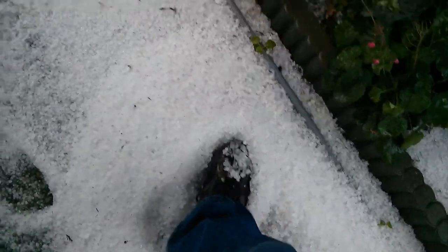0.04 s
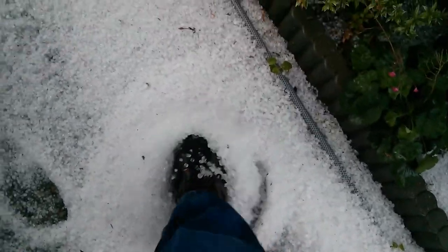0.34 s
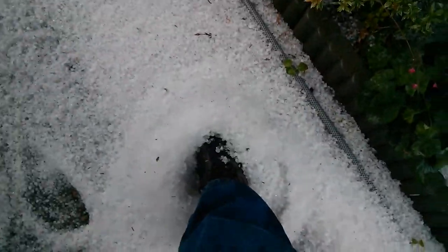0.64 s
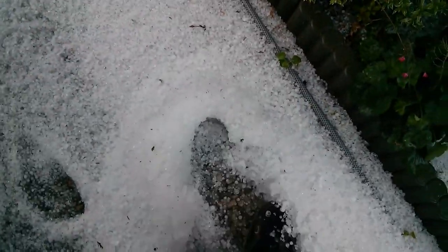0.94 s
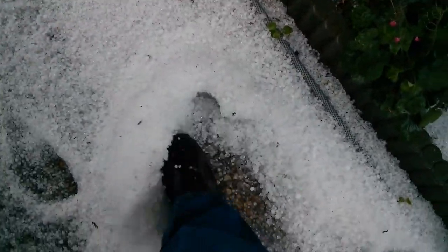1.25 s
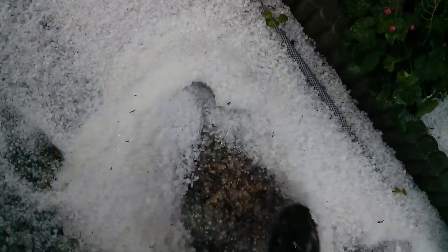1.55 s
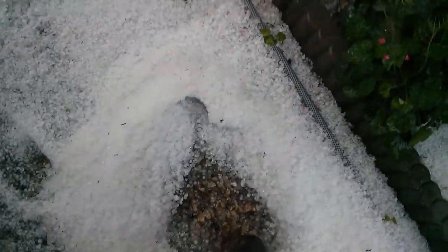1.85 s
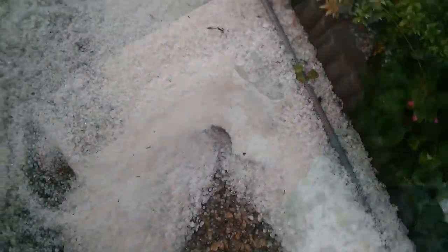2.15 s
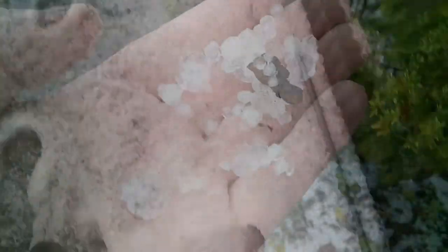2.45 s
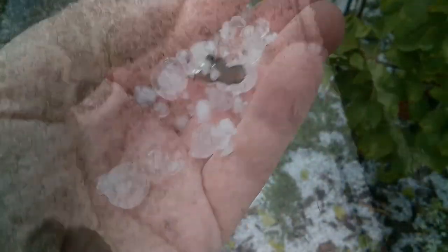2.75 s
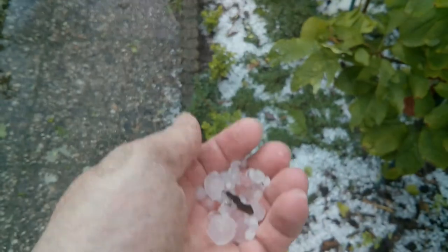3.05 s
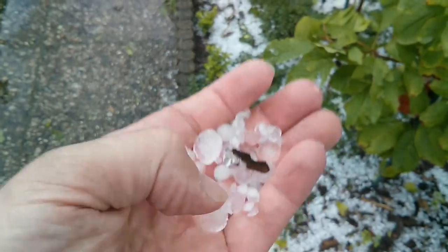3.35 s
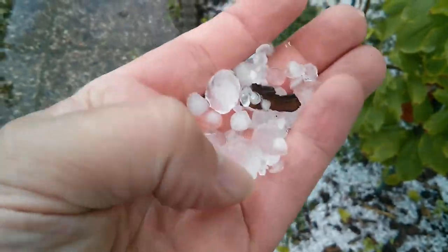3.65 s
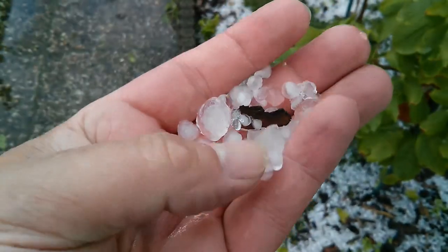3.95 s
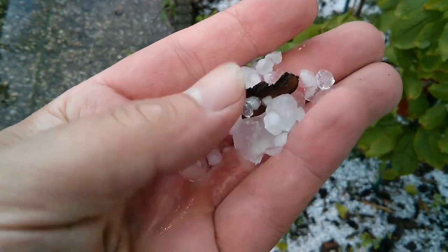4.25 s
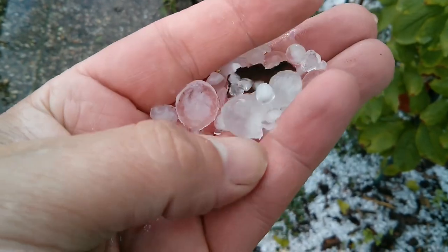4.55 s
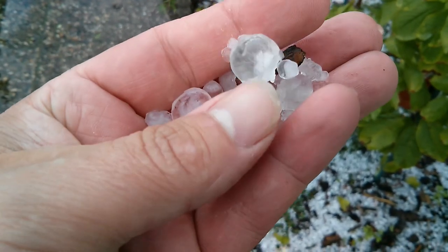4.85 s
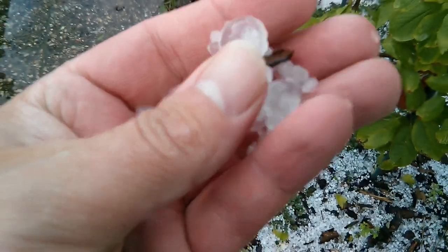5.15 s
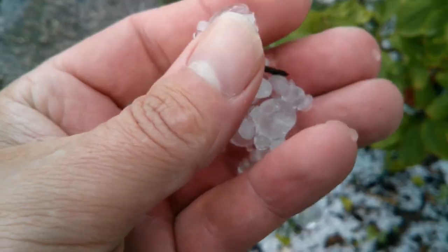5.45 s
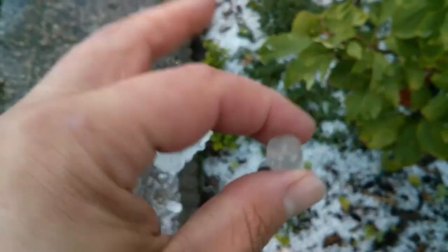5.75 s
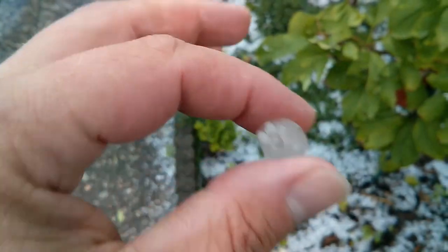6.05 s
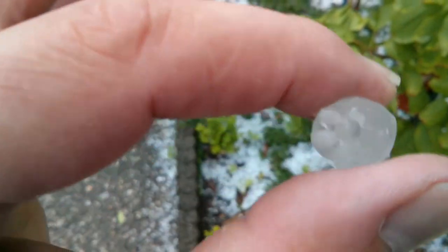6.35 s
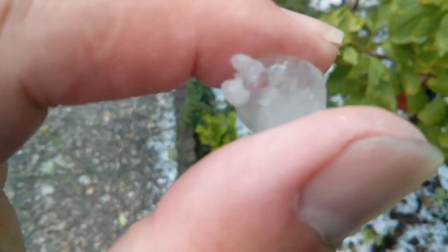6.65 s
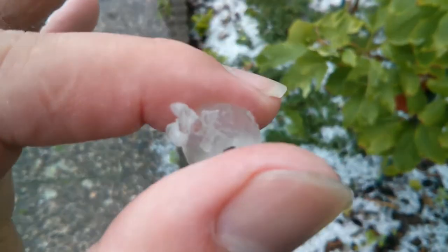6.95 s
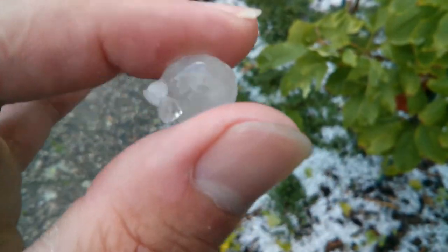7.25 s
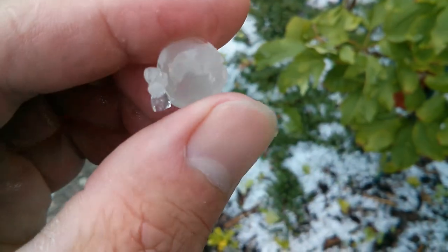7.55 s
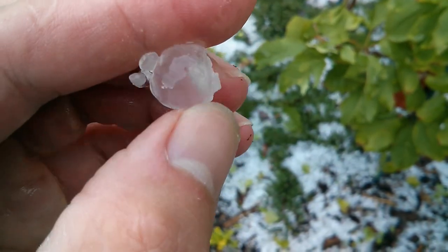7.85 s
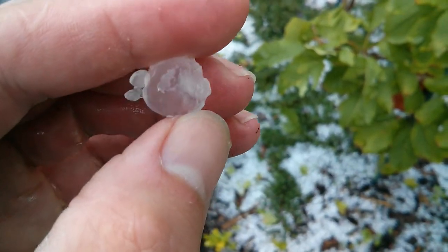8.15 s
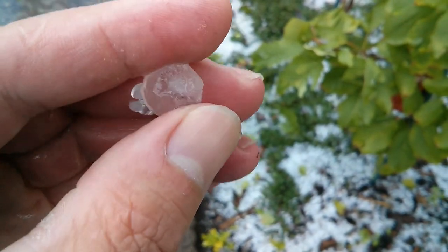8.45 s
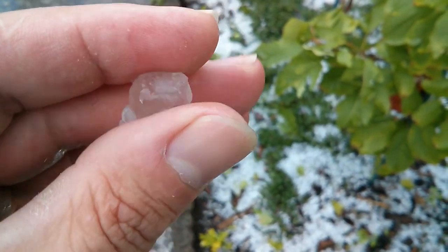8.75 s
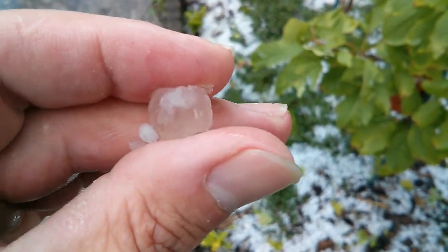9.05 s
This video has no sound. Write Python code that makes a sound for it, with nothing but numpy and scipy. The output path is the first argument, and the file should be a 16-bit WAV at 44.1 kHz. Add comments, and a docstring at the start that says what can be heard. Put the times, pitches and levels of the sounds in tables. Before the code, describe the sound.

Close to the microphone, a foot pushes through hail on the ground with a few loud, gritty crunches. Much quieter rustling and clicking follows as a handful of wet hailstones is handled. Falling stones then land with sharp, glassy clinks and a short rattle, and scattered drips and light ticks finish. Behind it all is a calm garden with a low rumble, light air and faint hiss.

```python
"""A low rumble, moving air and a fine hiss fill a quiet garden from start to end.
First a shoe scrapes several times through a thick layer of hailstones, which slip, snap and spray.
Then wet stones are rubbed together in a palm. Near 6 s two slip away and clink on something hard.
Last, melt water drips and one stone is turned between the fingers, with soft knocks and ticks.
The sound is mono and cuts out for a few instants during the scraping and the rubbing."""
import sys
import numpy as np
from scipy import signal
from scipy.fft import rfft, irfft, next_fast_len
from scipy.io import wavfile
from scipy.ndimage import uniform_filter1d, map_coordinates

SR = 44100
rng = np.random.default_rng(int(sys.argv[2]) if len(sys.argv) > 2 else 0)


def store_pcm(level_fs):
    """Save levels as 16-bit WAV."""
    pcm = np.round(np.clip(level_fs, -1, 1) * 32767).astype(np.int16)
    wavfile.write(sys.argv[1], SR, np.atleast_2d(pcm).T)


N = 400869
TIME = np.arange(N) / SR

# The bright tone of ice touching ice. Each row: frequency in Hz, level in dB.
ICE_TONE = [(500, -32), (3200, -23.5), (4400, -8.5), (5500, -0.5), (7000, 0.5), (9000, 3.5), (10500, 0),
            (13000, -3), (16000, -1.5)]
# The tone of the fine hiss and of splashes. Each row: frequency in Hz, level in dB.
HISS_TONE = [(2000, -33.5), (3500, -20.5), (5000, -7), (7000, 0), (8700, 2.5), (10500, -4), (13000, -9),
             (16000, -12)]
# The hiss is strongest while the palm is full of melting ice. Each row: time in seconds, level in dB.
HISS_LEVELS = [(1.42, -63), (1.75, -46), (2.6, -50), (4.3, -52), (5.6, -52.5), (6.35, -47), (7.0, -67),
               (7.7, -62), (8.7, -72.5), (9.05, -57)]


def amp(db):
    """Turn decibels into a number to multiply a sound by."""
    return 10 ** (np.asarray(db) / 20)


def unit(x):
    """Scale a sound so that its average power is 1."""
    return x / np.sqrt(np.mean(x ** 2) + 1e-20)


def fade(t, t60):
    """A fade that drops by 60 dB every t60 seconds."""
    return amp(-60 * t / t60)


def curves(rows):
    """Join rows that begin with a time by straight lines: one curve for each further column."""
    times, *columns = np.transpose(rows)
    return [np.interp(TIME, times, column) for column in columns]


def wobble(rate):
    """A smooth curve through random values, rate of them a second."""
    return map_coordinates(rng.standard_normal(int(N * rate / SR) + 4), [TIME * rate])


def colour(x, tone, size=4096):
    """Filter a sound with a tone table, whose rows give frequency in Hz and level in dB."""
    hz, db = np.transpose(tone)
    gain = amp(np.interp(np.log(np.fft.rfftfreq(size, 1 / SR) + 1), np.log(hz), db))
    # these steps keep the filter from ringing before a hit arrives
    cepstrum = irfft(np.log(gain))
    cepstrum[1:size // 2] *= 2
    cepstrum[size // 2 + 1:] = 0
    return signal.fftconvolve(x, irfft(np.exp(rfft(cepstrum))))[:len(x)]


def noise(tone, count=N):
    """Steady noise with the given tone."""
    return unit(colour(rng.standard_normal(count), tone))


def add(track, start, sound):
    """Mix a sound into the track, start seconds in."""
    first = max(round(start * SR), 0)
    part = track[first:first + len(sound)]
    part += sound[:len(part)]


def snaps(rate, spread_db, count=N):
    """Random clicks, about rate a second, some stronger than others."""
    hit = rng.random(count) < rate / SR
    strength = amp(spread_db * np.clip(rng.standard_normal(count), -2, 2))
    return unit(hit * strength * rng.choice([-1, 1], count))


def resonate(x, hz, q):
    """Make a sound ring at one pitch; a higher q rings longer."""
    hz = min(hz, SR / 3)
    return signal.lfilter(*signal.iirpeak(hz, max(q, 4 * hz / SR), SR), x)


def garden():
    """Distant rumble and moving air swell with the same gusts, under a fine hiss."""
    # The background. Each row: time in seconds, rumble level in dB, air level in dB, before the lifts.
    levels = [(1.42, -69, -60.5), (1.57, -54, -54), (1.78, -52, -51.5), (2.61, -53.5, -51.5),
              (2.91, -59, -58), (3.23, -56.5, -58.5), (3.96, -61.5, -60.5), (4.47, -61.5, -60.5),
              (5.05, -59, -57), (7.04, -54.5, -59.5), (7.66, -59, -58), (8.02, -57.5, -58.5),
              (8.23, -52, -58.5), (9.09, -48.5, -56)]
    # The tones of the rumble and the air. Each row: frequency in Hz, level in dB.
    rumble_tone = [(13, -39.5), (24, -15), (42, -1.5), (65, 2), (90, -4), (130, -4), (165, -9), (200, -2),
                   (225, -6), (330, -19), (430, -36.5), (730, -90)]
    air_tone = [(150, -27), (300, 1.5), (480, -3.5), (680, -3), (800, -11.5), (910, -4), (1080, -10),
                (1400, -6), (1620, -13), (2100, -9), (2600, -19.5), (3300, -25), (5000, -24.5)]
    rumble_lift_db, air_lift_db = 3, 1.5
    rumble_db, air_db = curves(levels)
    hiss_db, = curves(HISS_LEVELS)
    gust = wobble(6.5)
    rumble = noise(rumble_tone) * amp(rumble_db + rumble_lift_db + 2.7 * gust)
    air = noise(air_tone) * amp(air_db + air_lift_db + 0.43 * gust + 0.5 * wobble(8.1))
    hiss = noise(HISS_TONE) * amp(hiss_db + 0.52 * wobble(7.6))
    return rumble + air + hiss


def echo(x, t60):
    """Walls and paving send the sound back as a soft blur."""
    t = np.arange(SR // 2) / SR
    tail = rng.standard_normal(len(t)) * fade(t, t60) * (1 - np.exp(-t / 0.0031))
    return signal.fftconvolve(x, tail / np.linalg.norm(tail))[:N]


def crackle():
    """Melting ice on the skin crackles faintly, in clusters, just under the level of the hiss."""
    hiss_db, = curves(HISS_LEVELS)
    grains = sum(resonate(snaps(rate=35, spread_db=6), hz, q=5) for hz in (6200, 7800, 9800))
    clusters = amp(2.5 * wobble(5.3))
    return unit(colour(grains, ICE_TONE) * clusters) * amp(hiss_db - 0.5)


def squeaks():
    """Wet ice gives short, faint whistles."""
    # Each row: start in seconds, length in seconds, pitch in Hz, level in dB.
    whistles = [(0.006, 0.15, 4470, -58), (0.048, 0.078, 5630, -53), (1.619, 0.064, 4930, -56),
                (7.481, 0.02, 5070, -55)]
    out = np.zeros(N)
    for start, length, hz, db in whistles:
        swell = np.hanning(int(length * SR))
        tone = resonate(resonate(rng.standard_normal(len(swell)), hz, q=7.7), hz, q=7.7)
        add(out, start, amp(db) * unit(tone * swell))
    return out


def drips():
    """A drop of melt water taps on wet ground and its droplets patter down after it."""
    # Each row: start in seconds, peak of the tap in dB, level of the splash in dB.
    drops = [(6.5147, -15.5, -36), (6.6798, -19, -44.5), (6.9117, -33, -44), (7.217, -32, -57),
             (7.4168, -35.5, -47), (7.6136, -31, -47.5), (7.8889, -35, -48.5), (8.32, -32.5, -46.5),
             (8.9046, -19.5, -40.5)]
    out, t = np.zeros(N), np.arange(SR // 4) / SR
    for start, tap_db, splash_db in drops:
        blow = (t == 0) + 0.26 * fade(t, 0.011) * rng.standard_normal(len(t))
        tap = colour(resonate(blow, 8300, q=1.6), ICE_TONE)
        droplets = snaps(rate=2000, spread_db=2, count=len(t)) + 0.7 * rng.standard_normal(len(t))
        splash = unit(colour(droplets, HISS_TONE)) * fade(t, 0.2) * (1 - np.exp(-t / 0.0026))
        add(out, start, amp(tap_db) * tap / np.abs(tap).max() + amp(splash_db) * splash)
    return out


def knocks():
    """The hand makes dull bumps, each with a small icy edge."""
    # Each row: start in seconds, level in dB, pitch in Hz, icy edge in dB compared with the thud.
    bumps = [(3.153, -31.5, 388, -19), (3.336, -34.5, 380, -11.5), (3.696, -29.5, 262, -28),
             (4.8907, -18.5, 652, -12), (4.973, -35, 326, -18), (6.2, -37, 530, -12),
             (7.056, -28.5, 410, -24), (7.61, -35.5, 2110, -28), (8.401, -33.5, 1435, -24)]
    out, t = np.zeros(N), np.arange(SR // 8) / SR
    rise = 1 - np.exp(-t / 0.00102)
    for start, db, hz, edge_db in bumps:
        thud = np.sin(2 * np.pi * hz * t) * fade(t, 0.022)
        dull = resonate(rng.standard_normal(len(t)), hz * 0.46, q=0.58)
        flesh = unit(resonate(dull, hz * 0.46, q=0.58)) * fade(t, 0.11)
        bright = resonate(rng.standard_normal(len(t)), 5430, q=3.3)
        edge = unit(resonate(bright, 5200, q=2.7)) * fade(t, 0.056)
        add(out, start, amp(db) * rise * (thud + 0.19 * flesh + amp(edge_db) * edge))
    return out


def ticks():
    """A stone bounces or taps another and rings for an instant; its neighbours rattle briefly."""
    # Each row: start in seconds, peak level in dB, pitch in Hz.
    taps = [(1.7604, -20, 9680), (1.817, -15.5, 7680), (1.8911, -22, 7990), (3.1443, -14, 6550),
            (3.4416, -18.5, 8690), (4.3313, -14, 9040), (4.5253, -19.5, 7390), (4.8269, -21, 9580),
            (5.9664, -16.5, 7220), (5.9899, -18, 7640), (6.1703, -9.5, 5230), (6.1808, -7.5, 8560),
            (6.1852, -4, 8180), (6.202, 0.5, 9040), (6.2296, -11.5, 8390), (6.3415, -14, 7370),
            (6.3794, -20.5, 9470), (6.3844, -15.5, 8540), (6.4176, -23.5, 7720), (6.4467, -25, 8820),
            (6.7963, -34, 7260), (6.8475, -35, 5280), (8.8352, -36, 4750), (8.893, -29, 8700)]
    out, t = np.zeros(N), np.arange(SR // 8) / SR
    for start, db, hz in taps:
        blow = (t == 0) + 0.17 * fade(t, 0.02) * rng.standard_normal(len(t))
        tick = colour(resonate(blow, hz, q=2.8), ICE_TONE)
        add(out, start, amp(db) * tick / np.abs(tick).max())
    return out


def clinks():
    """A falling stone strikes something hard: a few clear notes ring over a clatter of crowded ones."""
    # Each row: start in seconds, level in dB, seconds to fade by 60 dB, low cut in Hz.
    landings = [(5.8855, -5.5, 0.13, 439), (6.0769, -9.5, 0.18, 3870), (6.262, -18.5, 0.14, 3450)]
    # The clear notes, then the tone of the clatter. Each row: frequency in Hz, level in dB.
    notes = [(2290, -19), (3800, -19), (4720, -17), (4940, -19.5), (5630, -4.5), (5930, -9), (6360, -18),
             (6555, -0.5), (7350, -0.5), (7642, -8), (7931, 0), (8460, 3.5), (8640, -11.5), (9125, -5),
             (11640, -24)]
    clatter_tone = [(300, -40.5), (2800, -35), (3700, -15.5), (4700, -16.5), (5600, -6), (6500, 1.5),
                    (7000, -11.5), (7600, 0), (9200, 1), (9900, -11.5), (12000, -17.5), (16000, -21)]
    out, t = np.zeros(N), np.arange(SR // 3) / SR
    for start, db, t60, low_hz in landings:
        changes_db = rng.normal(0, 1.5, len(notes))
        ring = sum(amp(level + change) * np.sin(2 * np.pi * (hz * t + rng.random()))
                   for (hz, level), change in zip(notes, changes_db))
        clatter = noise(clatter_tone, len(t)) * fade(t, 0.92 * t60)
        crack = noise(ICE_TONE, len(t)) * fade(t, 0.018)
        hit = 0.59 * unit(ring) * fade(t, t60) + 0.65 * clatter + 0.25 * crack
        # a smaller stone leaves the low notes quiet
        low_cut = signal.butter(4, low_hz, "high", fs=SR, output="sos")
        add(out, start, amp(db) * signal.sosfilt(low_cut, hit))
    return out


def rubs():
    """Each push of the thumb sets off a swell of tiny clicks from large and small stones in the palm."""
    # Each row: start in seconds, length in seconds, level in dB, middle pitch in Hz.
    thumb_pushes = [(1.756, 0.03, -32, 11000), (1.781, 0.069, -31, 7000), (1.888, 0.14, -34, 8400),
                    (2.057, .065, -32.5, 6400), (2.126, 0.076, -36, 10300), (2.422, 0.06, -45.5, 11000),
                    (2.752, 0.054, -35.5, 8000), (2.839, .14, -33.5, 8100), (3.096, 0.064, -36, 6450),
                    (3.42, 0.059, -37.5, 9400), (3.628, 0.055, -36, 9000), (3.771, 0.13, -39, 8500),
                    (3.957, 0.062, -38, 6400), (4.06, 0.16, -35, 8300), (4.274, 0.1, -36, 8600),
                    (4.519, 0.044, -31, 7300), (4.583, 0.037, -36, 8000), (4.634, 0.065, -32.5, 8300),
                    (4.838, 0.091, -41.5, 7600), (5.142, 0.064, -39.5, 8700), (5.72, 0.075, -39.5, 8800)]
    out = np.zeros(N)
    for start, length, db, hz in thumb_pushes:
        count = int(length * SR)
        swell = np.abs(np.sin(np.linspace(0, np.pi, count))) ** 0.38
        spread_octaves = 0.23 * min(hz / 8000, 1.1) ** 2  # small, high stones vary more in pitch
        contacts = 0
        for step in (-1, 0, 1):  # large, medium and small stones
            blows = snaps(rate=350, spread_db=5.5, count=count) + 0.29 * rng.standard_normal(count)
            contacts += resonate(blows, hz * 2 ** (step * spread_octaves), q=6.2)
        shards = snaps(rate=890, spread_db=5, count=count)  # the tiniest fragments
        contacts += amp(-9) * resonate(shards, 13500, q=3.5)
        add(out, start, amp(db) * unit(colour(contacts * swell, ICE_TONE)))
    return out


def strokes(rows, settle_t60):
    """The loudness of the shoe's strokes: each bites quickly, eases off and leaves stones rolling."""
    bite, ease = 1.16, 1.9  # powers that shape the rise and the fall
    settle_db, stop_s = -27, 1.388
    power = np.zeros(N)
    for start, rise, fall, db in rows:
        end = start + rise + fall
        effort = np.sin(np.pi / 2 * np.interp(TIME, [start, start + rise, end], [0, 1, 0]))
        swell = effort ** np.where(TIME < start + rise, bite, ease)
        progress = np.clip((TIME - start) / (rise + fall), 0, 1)
        settling = progress ** 2 * amp(settle_db) * fade(np.maximum(TIME - end, 0), settle_t60)
        power += (amp(db) * np.maximum(swell, settling)) ** 2
    return np.sqrt(power) * (TIME < stop_s)


def shoe():
    """Packed stones slip and snap under the sole while loose ones spray ahead of it."""
    # The sole pushes through the layer and throws loose stones ahead.
    # Each row: start in seconds, rise in seconds, fall in seconds, level in dB.
    pushes = [(.09, .03, 0.14, -51), (.272, 0.19, .085, -12.5), (.724, 0.18, 0.1, -12),
              (1.055, 0.094, 0.22, -15), (1.295, 0.057, .11, -14)]
    throws = [(.125, .035, 0.39, -51.5), (.27, 0.12, 0.18, -15), (.762, .125, 0.17, -15),
              (.97, 0.21, 0.13, -14.5), (1.25, .13, .06, -22.5)]
    # How far the sole has dug in. Each row: time in seconds, depth from 0 (top) to 1 (grit).
    depths = [(.5, 0.23), (.85, 0.5), (1.3, 0.5)]
    # Clumps giving way. Each row: start in seconds, level in dB.
    clumps = [(.4665, -7), (.4725, -6), (.487, -6.5), (.4995, -11), (0.7343, -23), (.7935, -3), (.846, -5),
              (1.122, -3.5), (1.176, -6), (1.336, -10.5)]
    # The tones of the layer, the grit below and the spray. Each row: frequency in Hz, level in dB.
    layer_tone = [(40, -42.5), (150, -24), (330, -21), (520, -10.5), (700, -0.5), (860, 7.5), (980, -4),
                  (1500, -11), (2050, -15), (2520, -35.5), (3100, -17.5), (4300, -33.5), (8000, -31.5),
                  (16000, -55)]
    grit_tone = [(40, -36), (150, -23), (300, -27.5), (430, -7.5), (580, -7), (780, -4.5), (1000, -2),
                 (1500, -3), (2050, -8), (2520, -13), (3100, -13.5), (4300, -20), (8000, -26), (16000, -48)]
    spray_tone = [(200, -21.5), (1000, -4), (2000, -9), (2600, -18.5), (3400, -11), (4300, -6),
                  (6300, -2.5), (8600, 2), (10000, -5.5), (14000, -8), (16000, -14)]
    push, throw = strokes(pushes, settle_t60=0.32), strokes(throws, settle_t60=0.85)
    depth, = curves(depths)
    slips = snaps(rate=700, spread_db=1) + 0.69 * rng.standard_normal(N)
    body = (1 - depth) * unit(colour(slips, layer_tone)) + depth * unit(colour(slips, grit_tone))
    crunch = body * push * amp(1.4 * wobble(60))
    crack = colour(signal.unit_impulse(SR // 20), layer_tone)
    for start, db in clumps:
        add(crunch, start, amp(db) * crack / np.abs(crack).max())
    rattle = snaps(rate=3500, spread_db=3) + 0.42 * rng.standard_normal(N)
    spray = unit(colour(rattle, spray_tone)) * throw * amp(0.76 * wobble(90))
    foot_thump = noise([(20, 2), (60, -4), (180, 2.5), (300, -10), (900, -52.5)]) * push * amp(-33)
    direct = amp(-0.6) * (crunch + spray) + foot_thump
    # a near reflection, 3 ms late, makes the scrape hollow
    reflection = np.interp(TIME - 0.00297, TIME, direct)
    return direct + 0.33 * reflection


def scene():
    """All sources reach one microphone, heard alike on both channels."""
    rub, tick, clink = rubs(), ticks(), clinks()
    to_echo = amp(-14.5) * rub + amp(-13) * tick + amp(-27.5) * clink
    mono = shoe() + rub + tick + clink + drips() + knocks() + squeaks() + crackle() + garden()
    mono += echo(to_echo, t60=0.59)
    return np.array([mono, mono])


def record(dry):
    """The sound cuts out briefly, the loudest peaks are clipped and the highest treble is removed."""
    # Moments when the sound cuts out. Each row: start in seconds, end in seconds.
    gaps = [(.853, .882), (.9035, .9155), (1.384, 1.405), (4.572, 4.586), (4.769, 4.787), (4.809, 4.819)]
    top_hz = 16000
    gain = np.ones(N)
    for start, end in gaps:
        gain[(TIME > start) & (TIME < end)] = amp(-51)
    clipped = np.clip(dry * uniform_filter1d(gain, size=32), -1, 1)
    size = next_fast_len(N + SR // 4)
    below_top = np.fft.rfftfreq(size, 1 / SR) < top_hz
    return irfft(rfft(clipped, size) * below_top, size)[:, :N]


dry = scene()
out = record(dry)
store_pcm(out)
```